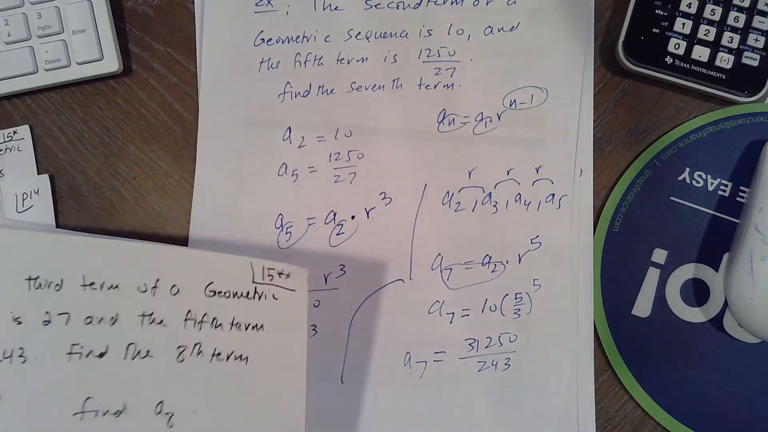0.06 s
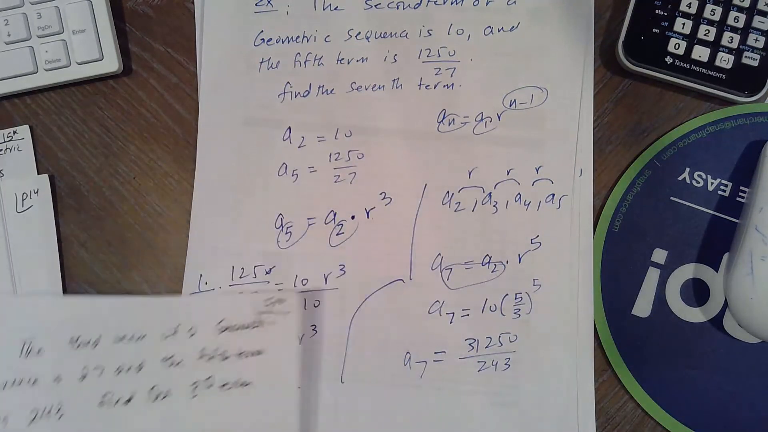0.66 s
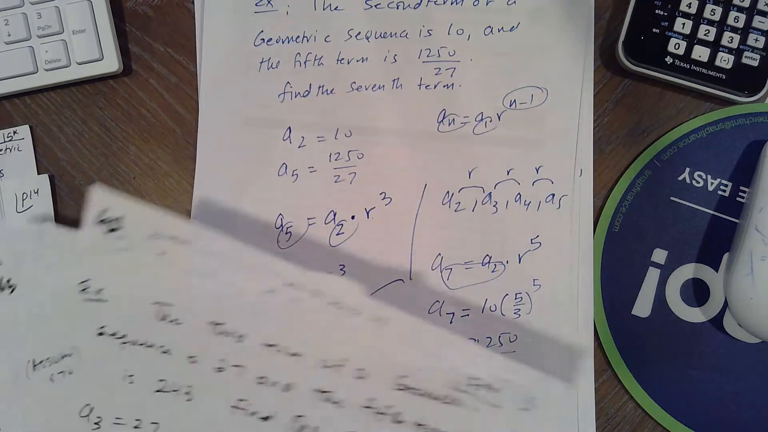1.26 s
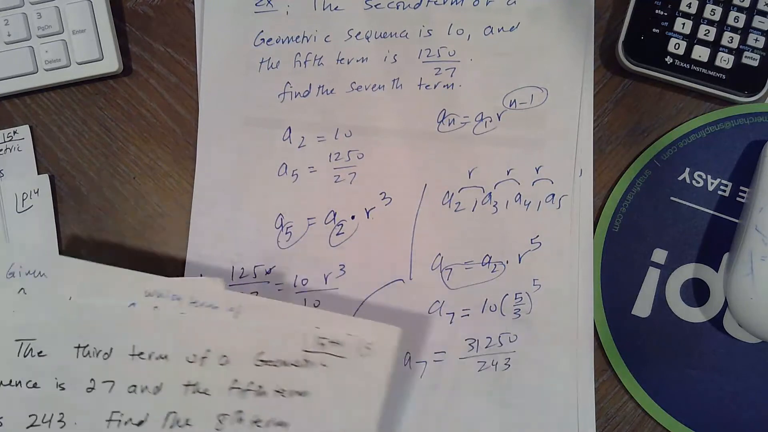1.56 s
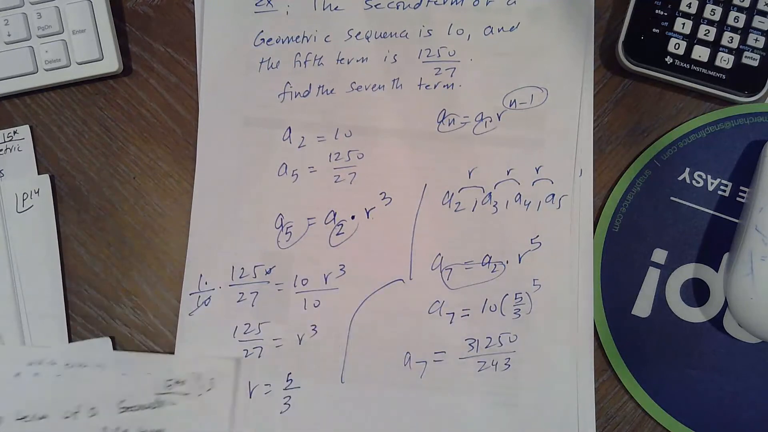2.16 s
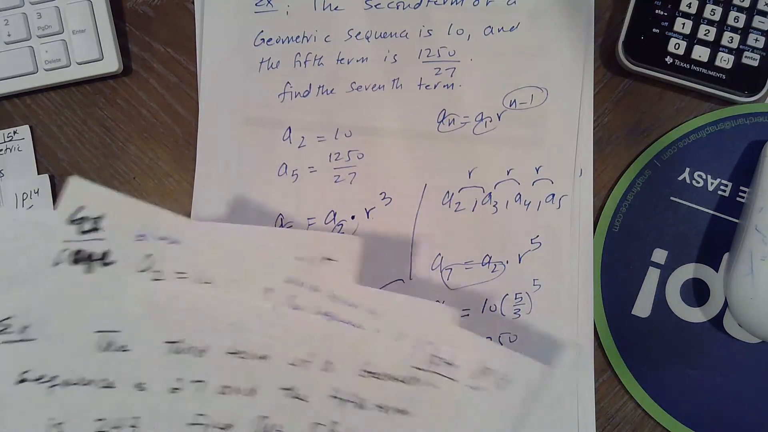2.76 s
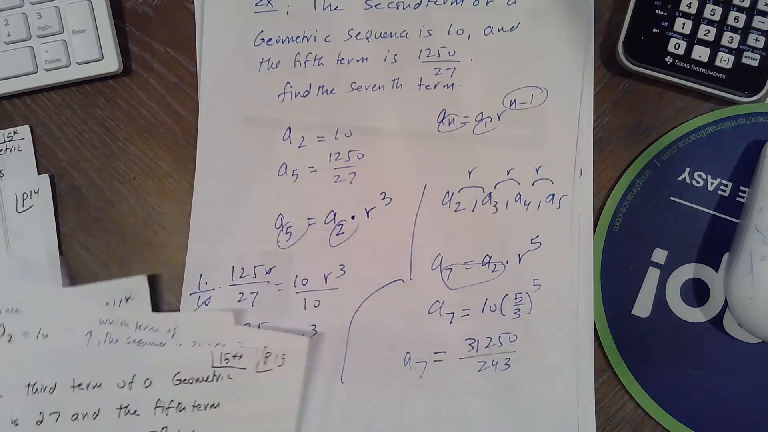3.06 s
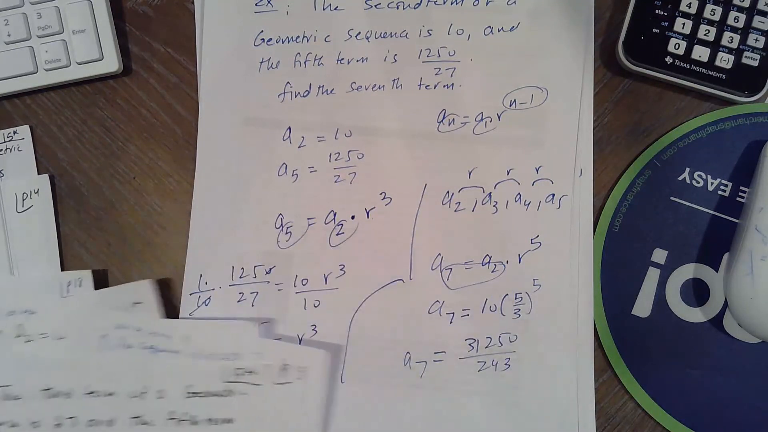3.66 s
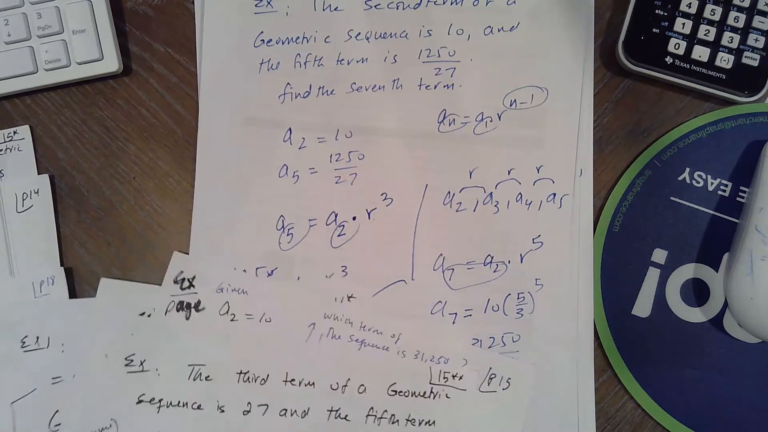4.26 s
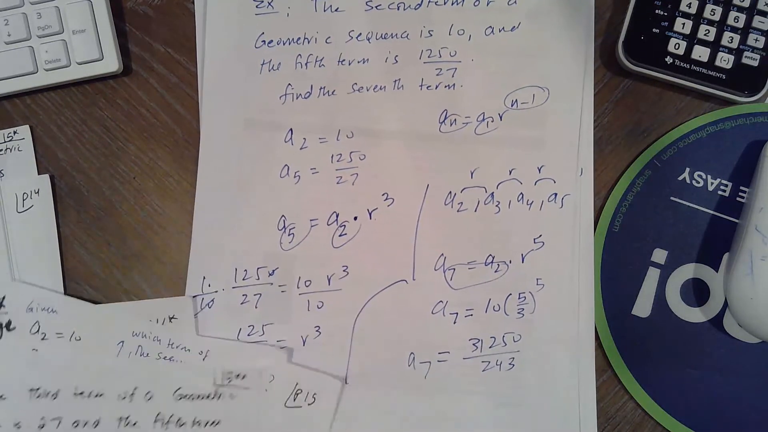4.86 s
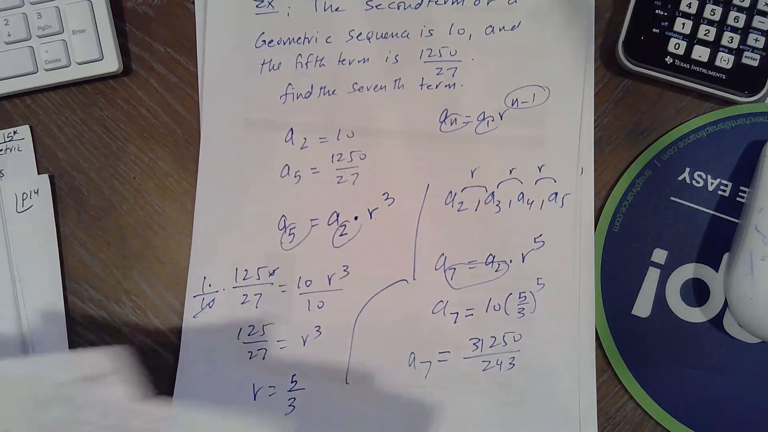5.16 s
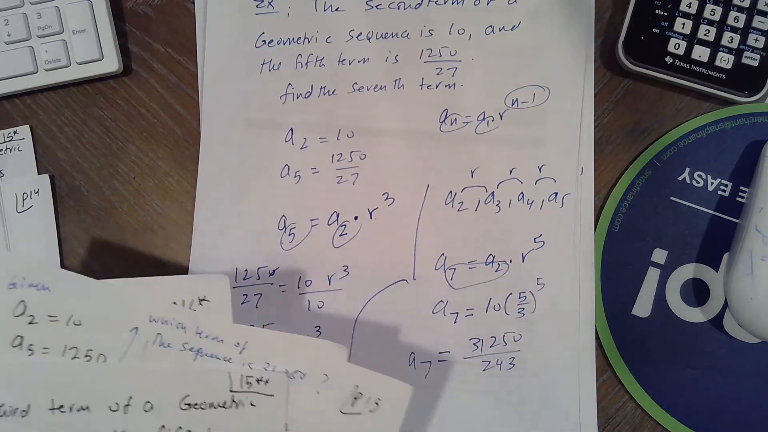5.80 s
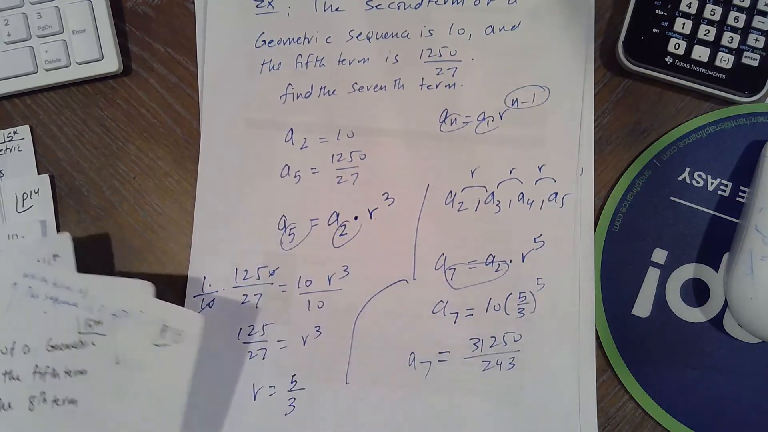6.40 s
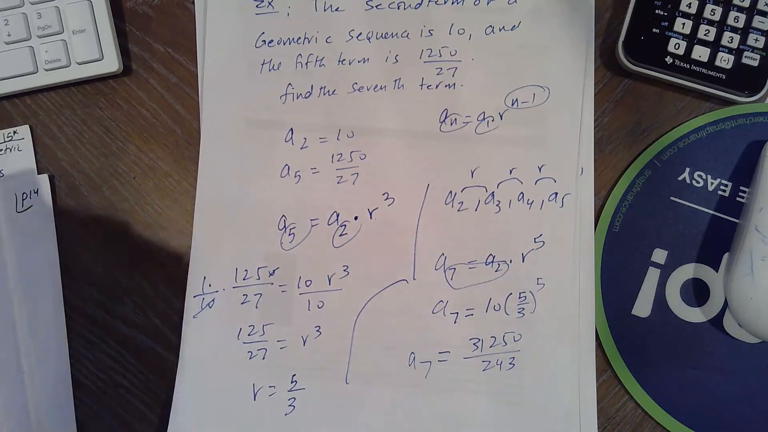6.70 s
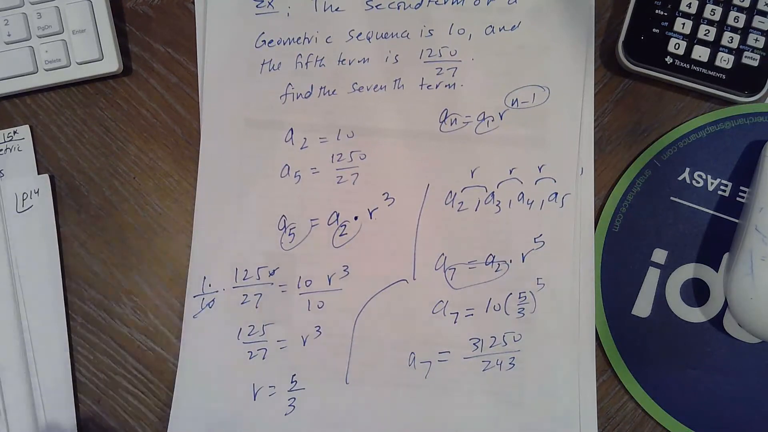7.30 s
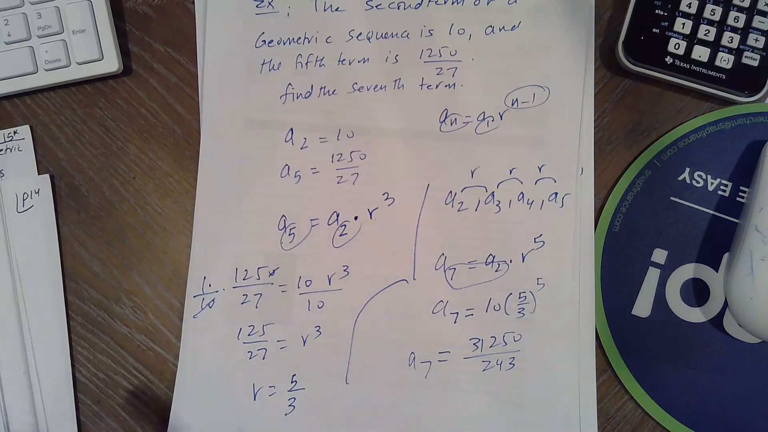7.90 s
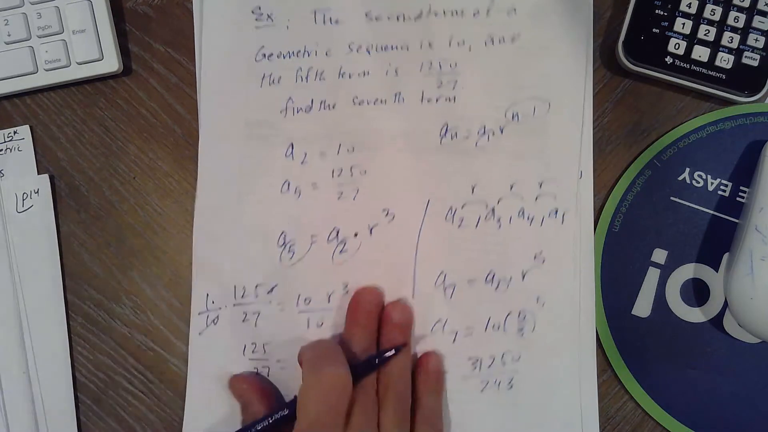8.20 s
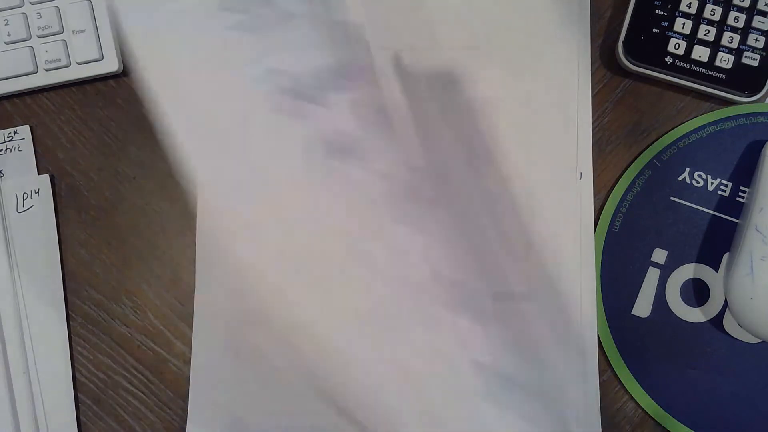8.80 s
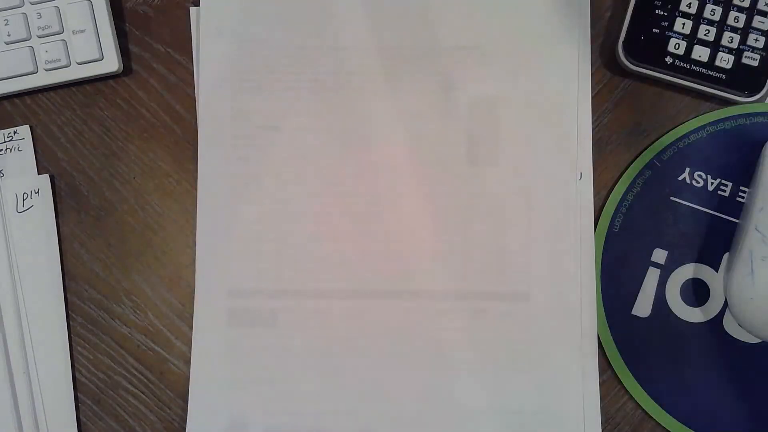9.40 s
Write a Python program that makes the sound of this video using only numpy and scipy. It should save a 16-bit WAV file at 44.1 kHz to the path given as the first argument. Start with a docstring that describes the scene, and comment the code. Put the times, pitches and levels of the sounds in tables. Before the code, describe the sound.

Paper sheets rustle, crackle and flap as they are shuffled close by, with one soft thump on a desk.

```python
"""Shuffling paper at a desk

Sheets are shuffled and turned by hand above a wooden desk, close to a small microphone.
Sliding fibres hiss, edges tick, bent sheets crackle and pop, and their broad faces flap softly.
The stack is put down with a thump. A small room echoes, over a faint steady background."""
import sys
import numpy as np
from scipy import signal
from scipy.fft import rfft, irfft
from scipy.io import wavfile
from scipy.ndimage import uniform_filter1d, map_coordinates

SR = 44100
rng = np.random.default_rng(int(sys.argv[2]) if len(sys.argv) > 2 else 0)


def wav_record(signal):
    """Record a signal, one row per channel, as 16-bit PCM in the file named by sys.argv[1]."""
    frames = np.transpose(np.atleast_2d(signal))
    bounded = np.clip(frames, -1, 1)
    # unit amplitude maps onto the largest positive 16-bit level
    quanta = np.round(bounded * 32767).astype(np.int16)
    wavfile.write(sys.argv[1], SR, quanta)


N = 416744
T = np.arange(N) / SR

# Event levels are relative: each sound adds its own gain. t60 is the time to fade by 60 dB.
# one sheet slides over another: t/s, rise/s, fall/s, level/dB of the hiss,
# airy top over hiss/dB, rasp over hiss/dB, taut over slack rasp/dB
STROKES = [(0.0, 0.0017, 0.085, -54, -3, 0, -4.5), (.06, 0.045, 0.12, -50.5, -6, -5, 2.5),
           (0.189, 0.029, 0.1, -52, -9, 0.5, 2), (.27, 0.018, 0.089, -55.5, -12, 8, -2),
           (.39, 0.13, .12, -57, -14, 3, 4), (.53, 0.087, 0.12, -53.5, -2.5, -2, 1),
           (.725, 0.045, 0.082, -47, 2, -10.5, -1), (.76, .13, .2, -56.5, 4.5, -5, 4.5),
           (1.009, .16, .11, -47, 1.5, -13, 6), (1.24, 0.13, .15, -55, 0, -14, 12),
           (1.485, .045, 0.12, -58, -4, -10, 3), (1.68, 0.029, .05, -74, -9, 10.5, -4),
           (1.74, 0.073, 0.075, -64.5, -2, 0, 3), (1.92, 0.19, 0.13, -58, -2, -1.5, 4),
           (2.06, 0.087, 0.13, -52, 2, -6, -1), (2.15, 0.072, 0.18, -52, 0.5, -8, 6),
           (2.335, 0.014, 0.14, -56, -1, -5, -3), (2.555, 0.018, .13, -65, 2, -2.5, -3),
           (2.68, 0.14, .065, -54, 1.5, -15, 9), (2.899, 0.019, 0.033, -52.5, -10, -5.5, -1),
           (2.94, 0.094, 0.11, -65, 7, -5, -7), (3.03, 0.093, 0.1, -49.5, 1, -10, -2),
           (3.16, 0.042, 0.11, -55.5, 1, -1, 3), (3.22, 0.077, .2, -57, -5, -2, 8),
           (3.34, 0.19, 0.1, -56.5, -2, -3, 8), (3.66, 0.17, 0.065, -57.5, 1.5, -5.5, 3),
           (3.855, 0.053, 0.08, -49, -3, -8.5, 7), (3.91, 0.087, 0.17, -53, 0.5, -10, 10),
           (4.08, 0.095, .15, -56.5, 0.5, -4.5, -3), (4.26, 0.15, 0.13, -62, -1, -9, 1),
           (4.56, 0.094, 0.035, -58.5, 3, -6, -5), (4.624, 0.045, 0.12, -45.5, 4.5, -14, 2),
           (4.67, 0.073, 0.069, -43.5, 0, -9.5, 0), (4.76, .08, 0.25, -48.5, 0, -11.5, 1),
           (4.966, 0.041, 0.038, -46.5, -17, 3.5, 11), (5.03, 0.034, 0.025, -47.5, -20, -4, 12),
           (5.285, 0.068, 0.12, -58, -1, -11, 11), (5.43, 0.035, 0.077, -50.5, -9, -10, 3),
           (5.594, 0.017, 0.054, -48, -2.5, -7.5, 2), (5.665, 0.048, .045, -44.5, 2, -8.5, -3),
           (5.72, 0.21, .1, -59.5, 2.5, -8, -2), (5.95, 0.062, 0.032, -60, -10, 4, 1.5),
           (6.04, 0.014, 0.18, -55, -2, -7, 3), (6.19, 0.034, 0.054, -56, -7, 2.5, 2.5),
           (6.33, .13, 0.044, -63, -5, -1, 7), (6.51, 0.041, 0.21, -61.5, -1, -4, 2),
           (6.72, 0.099, 0.077, -61.5, -1, -5, 1), (7.02, .02, 0.17, -57, 4, -4, 4),
           (7.18, 0.022, .04, -58.5, -12, -4, -5), (7.2, 0.22, 0.14, -60.5, 3, 1.5, -1),
           (7.375, 0.0085, 0.069, -37, -2, -1.5, 6), (7.4, .035, 0.19, -51.5, -3, 0, 2),
           (7.52, 0.14, .13, -66.5, -14, 1, 1), (7.705, 0.051, 0.023, -47.5, -2, -6, 1),
           (7.765, 0.03, 0.075, -45, -5, -6, -2.5), (7.89, 0.11, 0.13, -68, -2, -1.5, 12),
           (8.158, .015, 0.03, -60, 9, 2, -4), (8.195, 0.079, 0.085, -44, -2, -18, 7),
           (8.285, 0.042, 0.05, -37.5, -4, -12, 26), (8.359, 0.045, 0.15, -40, 3, -2, 30),
           (8.43, 0.087, 0.23, -42, -1.5, -6, 12), (8.61, 0.026, 0.079, -52, -9, 6, 12),
           (9.02, .035, 0.018, -64.5, -1.5, -6, 1), (9.295, 0.013, 0.031, -64, 5.5, -5, 3),
           (9.38, 0.044, .08, -73, -5, 4.5, 2)]
# tone of sliding paper (hiss, airy top, slack rasp, taut rasp): f/Hz, level/dB
HISS_TONE = [(2000, -34.5), (3300, -5.5), (4100, -5.5), (6000, -1.5), (7500, -1), (9200, -3),
             (10500, -18.5), (13000, -30)]
AIR_TONE = [(7500, -31), (9000, -7.5), (10000, -5.5), (12500, -5), (15000, -11.5), (16000, -4)]
SLACK_TONE = [(300, -22), (700, -7), (1000, -3), (1400, -2.5), (2000, -26.5), (4000, -19)]
TAUT_TONE = [(900, -22.5), (1450, -7), (1900, -2.5), (2400, 0.5), (3300, -3), (4300, -2.5), (6500, -23.5)]
# a sheet is swung through the air: t/s, rise/s, fall/s, level/dB
FLAPS = [(0.0, 0.0038, 0.18, -65.5), (.195, 0.013, 0.035, -56), (.29, 0.21, .22, -56), (.7, 0.12, .3, -65),
         (.99, 0.039, 0.047, -57), (1.118, 0.026, 0.17, -62), (2.0, 0.13, 0.36, -67),
         (3.06, 0.096, 0.27, -55.5), (3.755, 0.015, 0.18, -53), (4.06, 0.023, 0.41, -59.5),
         (4.62, 0.02, 0.41, -57.5), (4.9, 0.075, 0.33, -61.5), (5.56, 0.15, 0.2, -63),
         (6.0, 0.28, 0.14, -63), (6.415, 0.021, 0.18, -57.5), (7.025, 0.097, .1, -46.5),
         (7.36, 0.012, 0.23, -43.5), (7.71, 0.087, 0.14, -52.5), (8.15, 0.023, 0.16, -59),
         (8.36, 0.034, 0.95, -62.5), (8.75, 0.026, 0.14, -58), (9.202, 0.012, 0.095, -50),
         (9.36, 0.11, .2, -65.5)]
# tone of a flap: f/Hz, level/dB
FLAP_TONE = [(35, -38), (55, -8), (80, -9.5), (130, 0.5), (200, -3.5), (250, 1.5), (330, -2), (450, 0.5),
             (700, -4), (950, -6), (1600, -47), (4000, -40)]
# tone of the room's air noise: f/Hz, level/dB
ROOM_TONE = [(25, -49), (50, -12), (90, 9), (140, 15), (260, 8), (500, -9), (1000, -9.5), (2500, -34),
             (6000, -28), (10000, -63), (16000, -24)]
# fingers drag a sheet hard: t/s of the peak, level/dB, length/s
DRAGS = [(.145, -55, 0.023), (1.199, -43, 0.015), (2.922, -60, 0.037), (8.245, -47.5, 0.056),
         (8.322, -29, 0.036), (8.425, -34, 0.058), (8.552, -41, 0.026)]
# tone of a drag: f/Hz, level/dB
DRAG_TONE = [(2000, -44), (4300, -9), (5200, 5), (5900, 6.5), (7000, 6.5), (8000, -13), (10000, 1),
             (15000, -19)]
# an edge flicks off another sheet: t/s, level/dB, t60/s
FLICKS = [(0.149, -35, 0.027), (0.2833, -51, 0.037), (0.4172, -44, 0.013), (1.1959, -26, 0.025),
          (1.2484, -40, 0.038), (2.354, -37.5, 0.035), (2.566, -52, 0.035), (2.9153, -52, 0.028),
          (3.016, -47, 0.038), (3.7764, -44.5, 0.032), (4.143, -34.5, 0.035), (5.0084, -39, 0.02),
          (5.038, -36, 0.015), (5.606, -34, 0.032), (6.0527, -42, 0.035), (7.0313, -45, 0.039),
          (7.1096, -36, 0.063), (7.383, -28, 0.026), (7.839, -31, 0.025), (8.163, -45, 0.025),
          (8.1763, -40.5, 0.026), (8.3004, -38, 0.031), (8.386, -29, 0.035), (8.6033, -28.5, 0.035),
          (8.623, -34, 0.02), (9.309, -51, 0.035)]
# a sheet is bent: t/s, rise/s, fall/s, level/dB
BENDS = [(.2, 0.02, 0.34, -49), (0.337, 0.014, 0.06, -27), (.36, 0.089, 0.053, -30.5),
         (0.516, 0.026, 0.061, -34.5), (4.992, 0.0067, 0.044, -34.5), (5.031, 0.01, 0.033, -44),
         (7.07, 0.055, 0.042, -44.5), (8.76, 0.019, 0.069, -50), (9.205, 0.021, 0.042, -49.5)]
# tone of its crackle: f/Hz, level/dB
CRACKLE_TONE = [(30, -45), (100, -37), (400, -19.5), (650, -8), (850, -1), (1250, 3), (1900, -2),
                (2900, -6.5), (4000, -23.5), (7000, -50), (15000, -61)]
# a sheet snaps into a new shape: t/s, level/dB, f/Hz, t60/s
BUCKLES = [(0.203, -26.5, 2080, 0.01), (0.3483, -29.5, 1760.0, 0.047), (0.358, -44, 1240, 0.02),
           (0.398, -33, 1660, 0.053), (0.4167, -27.5, 2330, 0.036), (0.424, -37, 1990, 0.026),
           (0.438, -31, 1980, 0.062), (0.449, -39, 1330, 0.021), (0.5187, -32.5, 1800, 0.03),
           (0.537, -37, 1460.0, 0.027), (0.764, -41, 2450.0, 0.018), (0.838, -48, 2150, 0.025),
           (1.1307, -49.5, 2400, 0.018), (1.1982, -40, 2280, 0.028), (1.5857, -55, 3740.0, 0.022),
           (1.877, -52.5, 2540, 0.048), (2.353, -47, 3020, 0.017), (2.3758, -54, 2180, 0.047),
           (3.1037, -32.5, 2290, 0.018), (3.235, -48.5, 1580.0, 0.02), (3.3403, -49, 2100, 0.019),
           (3.775, -46, 1980, 0.022), (4.041, -47, 2920.0, 0.022), (4.1425, -45, 2270, 0.031),
           (4.2606, -46.5, 1080, 0.035), (4.734, -32.5, 4600, 0.013), (4.7557, -36, 3220.0, 0.018),
           (4.9986, -24, 2900, 0.025), (5.001, -34, 1300, 0.04), (5.038, -39, 1400, 0.03),
           (5.5896, -48, 1700, 0.024), (5.607, -52, 3440.0, 0.022), (5.67, -49, 1720, 0.011),
           (6.0516, -50.5, 2400, 0.053), (6.262, -46.5, 1310.0, 0.014), (6.4274, -43.5, 2073, 0.038),
           (6.4962, -58, 1480.0, 0.022), (6.9178, -62, 3700.0, 0.022), (7.041, -42.5, 2270.0, 0.025),
           (7.0975, -41, 1330, 0.02), (7.3249, -58, 1800.0, 0.024), (7.647, -52, 1930.0, 0.027),
           (7.823, -42.5, 1510, 0.025), (8.3846, -22, 2650, 0.02), (8.7722, -45.5, 1560.0, 0.031),
           (8.9684, -53, 2320.0, 0.029), (9.0803, -54, 1210, 0.11), (9.1474, -50, 1420, 0.068),
           (9.2137, -39.5, 2470, 0.028)]
# a sheet settles on a cushion of air: t/s of the peak, level/dB, length/s
PUFFS = [(0.466, -56, 0.083), (1.147, -58, 0.056), (3.26, -49.5, 0.039), (3.79, -55, 0.08),
         (5.334, -64, .07), (6.214, -61, 0.073), (6.527, -61, 0.04), (7.12, -54, 0.12),
         (8.266, -54.5, 0.083)]
# paper or a hand lands on the desk: t/s, level/dB, f/Hz where the treble starts to drop (soft is low)
LANDINGS = [(0.7575, -48.5, 500), (1.128, -49, 500), (3.102, -43.5, 900), (3.2449, -54, 300),
            (3.77, -50, 700), (4.6495, -38, 1200), (4.735, -47.5, 600), (4.755, -42, 900),
            (5.669, -46.5, 900), (6.051, -51, 700), (6.423, -52, 900), (7.098, -52, 900),
            (7.3795, -26, 400), (7.3821, -19.5, 1410), (7.392, -25, 1100), (7.4177, -23, 1400),
            (7.4701, -33.5, 2040), (7.822, -47, 1100), (7.961, -56, 400), (8.174, -49.5, 700),
            (8.385, -43.5, 900), (9.147, -54, 600), (9.215, -53, 900)]
# tone of the slap: f/Hz, level/dB
SLAP_TONE = [(25, -20.5), (50, -30), (100, -23), (160, -14.5), (245, -3.5), (370, -7.5), (550, 1),
             (680, -7.5), (880, 2.5), (1300, -11), (2200, -21.5), (6000, -30.5)]
# notes at which the paper-laden desk rings: f/Hz, level/dB, t60/s
DESK_NOTES = [(74.4, -30, 0.33), (114.3, -15, 0.28), (163, -11, 0.13), (243, -8.5, 0.14), (260, -8, 0.27),
              (366, -6, 0.14), (465, 5, 0.13), (507, 3, 0.057), (600, -5, 0.089), (576, -6.5, .14),
              (760, 2, 0.17), (810, -4, 0.44), (844, -2, 0.2), (857, -10, 0.12), (974, -13, 0.27),
              (980, -12, 0.18), (1236, -4, 0.076), (1290, -15, .25), (1635, -5, 0.1)]
# tone of a flick, a puff and the room's echo: f/Hz, level/dB
FLICK_TONE = [(800, -12), (3000, -13), (6000, -0.5), (9000, -3), (15000, -13.5)]
PUFF_TONE = [(25, -21), (45, -17.5), (70, -7), (130, 4), (200, -11.5), (500, -42), (2000, -57)]
ECHO_TONE = [(100, 4), (900, 3), (3000, -2), (7000, 0.5), (15000, -6.5)]


def undb(db):
    """Turn decibels into a gain."""
    return 10 ** (np.asarray(db) / 20)


def unit(x):
    """Scale to an average strength (rms) of 1."""
    return x / np.sqrt(np.mean(x ** 2))


def colour(x, tone, size=2048):
    """Filter a sound with a tone table of f/Hz, level/dB."""
    hz, db = np.transpose(tone)
    grid = np.maximum(np.fft.rfftfreq(size, 1 / SR), 1)
    gain = undb(np.interp(np.log(grid), np.log(hz), db))
    # fold the filter so that nothing sounds before its cause
    cepstrum = irfft(np.log(gain))
    cepstrum[1:size // 2] *= 2
    cepstrum[size // 2 + 1:] = 0
    response = irfft(np.exp(rfft(cepstrum)))
    return signal.oaconvolve(x, response)[:len(x)]


def fade(t, t60):
    """Die away, 60 dB down after t60 seconds."""
    return np.exp(-np.log(1000) * t / max(t60, 1e-3))


def wander(rate):
    """A smooth random drift of size 1 that turns `rate` times a second."""
    hold = max(int(SR / rate), 2)
    steps = np.repeat(rng.standard_normal(N // hold + 1), hold)[:N]
    return unit(uniform_filter1d(steps, hold))


def slips(tone, rate, spread_db):
    """Noise made of tiny uneven clicks, about `rate` a second, in the given tone; rms 1."""
    happens = rng.random(N) < rate / SR
    size = undb(spread_db * np.minimum(rng.exponential(size=N), 5))
    clicks = happens * size * rng.choice([-1, 1], N)
    return unit(colour(clicks, tone))


def add(track, s, sound):
    """Mix a sound into the track at s seconds."""
    start = max(int(s * SR), 0)
    track[start:start + len(sound)] += sound[:max(N - start, 0)]


def at_peak(sound, db):
    """Bring the strongest two milliseconds of a sound to the given level."""
    return sound * undb(db) / np.sqrt(uniform_filter1d(sound ** 2, size=88).max())


def gesture(start, rise, fall, db, shape):
    """Power of one hand movement: it builds up, then dies away, 20 dB down after the fall."""
    power = np.zeros(N)
    up = np.sin(np.linspace(0, np.pi / 2, max(int(rise * SR), 2))) ** 3
    down = 0.01 ** ((T[:int(4 * fall * SR)] / fall) ** shape)
    add(power, start, np.r_[up, down] * undb(db) ** 2)
    return power


def swells(table):
    """A smooth rise and fall for each row of t/s, level/dB, length/s."""
    out = np.zeros(N)
    for s, db, length in table:
        bump = signal.windows.gaussian(int(4 * length * SR), length * SR / 2 ** 1.5)
        add(out, s - 2 * length, undb(db) * bump)
    return out


def pushes(laid_down_s=8.5, laid_down_db=-4.5):
    """How strongly the hands drive the hiss, the airy top, the slack rasp and the taut rasp."""
    # held sheets never lie quite still; this rustle drops once the page is turned
    idle_hiss, idle_air, idle_rasp = undb([-71, -72, -71.5]) ** 2
    held = undb(laid_down_db * (T > laid_down_s))
    power = np.outer([idle_hiss, idle_air, idle_rasp / 2, idle_rasp / 2], held ** 2)
    for start, rise, fall, db, air_db, rasp_db, taut_db in STROKES:
        span = slice(int(start * SR), int((start + rise + 2 * fall) * SR))
        slack = undb(rasp_db) / np.hypot(1, undb(taut_db))
        shares = np.array([1, undb(air_db), slack, slack * undb(taut_db)]) ** 2
        power[:, span] += np.outer(shares, gesture(start, rise, fall, db, shape=2.4)[span])
    return np.sqrt(power)


def crinkles(rate=420, low_hz=1600, high_hz=11000, spread_db=2, cycles=7):
    """Tiny creases give way at random, each a dry tick at its own pitch; rms 1."""
    when, pitch, chance = rng.random((int(rate * N / SR), 3)).T[:, :, None]
    hz = low_hz * (high_hz / low_hz) ** pitch
    size = undb(spread_db * np.minimum(-np.log(1 - chance), 4)) * np.sqrt(hz)
    age = np.arange(256)  # samples
    turns = hz * age / SR
    ticks = size * np.sin(2 * np.pi * turns) * fade(turns, cycles)
    places = (when * N).astype(int) + age
    return unit(np.bincount(places.ravel(), ticks.ravel(), N)[:N])


def sliding(hiss_db=-1.14, air_db=-1, rasp_db=-1, crinkle_db=-16, drift_db=1.06):
    """Fibres catch and let go by the thousand; the grip varies as the touching spot moves."""
    hiss_push, air_push, slack_push, taut_push = pushes()
    grip_db = 1.32 * wander(rate=55) + 1.2 * wander(rate=410)
    hiss = slips(HISS_TONE, rate=14000, spread_db=1) * undb(hiss_db + drift_db * wander(rate=40))
    air = slips(AIR_TONE, rate=22000, spread_db=2) * undb(air_db + drift_db * wander(rate=58))
    # coarser catches shake the whole sheet, at a higher pitch the tauter it is
    slack = slips(SLACK_TONE, rate=3000, spread_db=3)
    taut = slips(TAUT_TONE, rate=4900, spread_db=-1)
    rasp = (slack * slack_push + taut * taut_push) * undb(rasp_db)
    rustle = hiss + undb(crinkle_db) * crinkles()
    return (rustle * hiss_push + air * air_push + rasp) * undb(grip_db)


def shimmer(x, patchy_db=2, rate=16, width_hz=420):
    """Narrow bands of the hiss swell and fade at random."""
    hz, s, frames = signal.stft(x, SR, nperseg=512)
    chance = rng.standard_normal((256, 512))
    grid = np.meshgrid(hz / width_hz, s * rate, indexing="ij")
    hills = map_coordinates(chance, grid, order=3, mode="mirror")  # smooth over pitch and time
    gain = unit(undb(patchy_db * hills))
    return signal.istft(frames * gain, SR)[1][:len(x)]


def flapping(gain_db=-3, flutter_db=2.5, idle_db=-72.5):
    """The faces of the sheets push air and brush the desk."""
    swing = np.sqrt(undb(idle_db) ** 2 + sum(gesture(*flap, shape=1.3) for flap in FLAPS))
    flutter = slips(FLAP_TONE, rate=2500, spread_db=4)
    return flutter * swing * undb(gain_db + flutter_db * wander(rate=45))


def background(level_db=-74.5):
    """The air in the room makes a faint, steady noise."""
    return unit(colour(rng.standard_normal(N), ROOM_TONE)) * undb(level_db)


def dragging():
    """Under pressure the rubbing turns into a narrow, bright zip."""
    return slips(DRAG_TONE, rate=9600, spread_db=3) * swells(DRAGS)


def flicking(gain_db=-6):
    """A released edge scrapes past in one bright tick."""
    out, t = np.zeros(N), T[:SR // 6]
    for s, db, t60 in FLICKS:
        scrape = rng.standard_normal(len(t)) * fade(t, t60)
        add(out, s, at_peak(colour(scrape, FLICK_TONE), db + gain_db))
    return out


def bending(gain_db=-3, cluster_db=1.5):
    """A bent sheet crackles as it gives way in clusters of small buckles."""
    effort = np.sqrt(sum(gesture(*bend, shape=1.11) for bend in BENDS))
    crackle = slips(CRACKLE_TONE, rate=2600, spread_db=3)
    return crackle * effort * undb(gain_db + cluster_db * wander(rate=140))


def buckling(gain_db=-1, shiver_db=-23, shiver_t60=0.2, ring_db=-8):
    """Each snap sends a short burst of ripples over the sheet, which then shivers out."""
    out, t = np.zeros(N), T[:SR // 6]
    # the burst is strongest at its own pitch and falls off steeply above
    octaves = np.array([-5, -3, -1.7, -.8, 0, .7, 1.3, 3])
    levels_db = [-45, -23, -11, -1, 0, -4, -19, -42]
    for s, db, hz, t60 in BUCKLES:
        decay = fade(t, t60) + undb(shiver_db) * fade(t, shiver_t60)
        ripples = rng.standard_normal(len(t)) * decay
        ripples[0] += 4  # the snap itself
        burst = colour(ripples, np.c_[hz * 2 ** octaves, levels_db])
        ring = np.sin(2 * np.pi * hz * t) * fade(t, t60 / 2)  # the snapped patch rings briefly
        pop = at_peak(burst, 0) + at_peak(ring, ring_db)
        add(out, s, at_peak(pop, db + gain_db))
    return out


def puffing(gain_db=-5):
    """Air squeezed from under a settling sheet makes a dull thud."""
    bass = unit(colour(rng.standard_normal(N), PUFF_TONE))
    return bass * swells(PUFFS) * undb(gain_db)


def landing(gain_db=-1, slap_db=-11.5, ring_db=-31, slap_t60=0.024, patchy_db=1):
    """Paper lands with a cushioned slap, and the desk rings briefly under it."""
    out, t = np.zeros(N), T[:SR // 3]
    notes = np.array([undb(db) * np.sin(2 * np.pi * hz * t) * fade(t, t60) for hz, db, t60 in DESK_NOTES])
    for s, db, hz in LANDINGS:
        # every spot on the desk wakes its own mix of the notes
        spot = undb(patchy_db * rng.standard_normal(len(notes))) * rng.choice([-1, 1], len(notes))
        slap = colour(rng.standard_normal(len(t)) * fade(t, slap_t60), SLAP_TONE)
        knock = at_peak(slap, slap_db) + undb(ring_db) * (spot @ notes)
        cushion = signal.butter(1, hz, fs=SR)
        add(out, s, at_peak(signal.lfilter(*cushion, knock), db + gain_db))
    return out


def ringing(start_s=1.198, hz=2116, level_db=-68, t60=4.1):
    """An object brushed by the edge of a sheet rings on with one thin tone."""
    t = np.maximum(T - start_s, 0)
    return undb(level_db) * np.sin(2 * np.pi * hz * t) * fade(t, t60)


def room(x, echo_db=-11, t60=0.46, gap_s=0.0061):
    """Sound bounces off the desk and near walls and comes back duller."""
    t = T[:SR // 2]
    bounces = rng.standard_normal(len(t)) * fade(t, t60) * (t > gap_s)
    echo = colour(bounces, ECHO_TONE) / np.sqrt(np.sum(fade(t, t60) ** 2))
    return x + undb(echo_db) * signal.oaconvolve(x, echo)[:N]


def scene():
    """All the paper sounds in the room, on one channel."""
    paper = shimmer(sliding()) + flapping() + dragging() + flicking()
    paper += bending() + buckling() + puffing() + landing()
    return (room(paper) + background() + ringing())[None]


def record(dry, bass_hz=66, top_hz=15850):
    """The deep bass is cut away; the recorder cuts the highest treble steeply."""
    bass_cut = signal.butter(4, bass_hz, "high", fs=SR, output="sos")
    top_cut = signal.ellip(10, .2, 70, top_hz, fs=SR, output="sos")
    return signal.sosfilt(top_cut, signal.sosfilt(bass_cut, dry))


dry = scene()
out = record(dry)
wav_record(out)
```